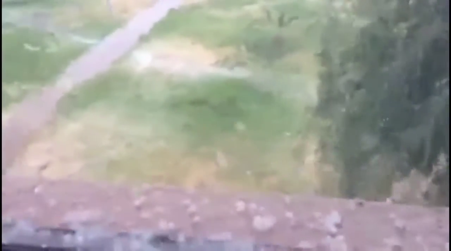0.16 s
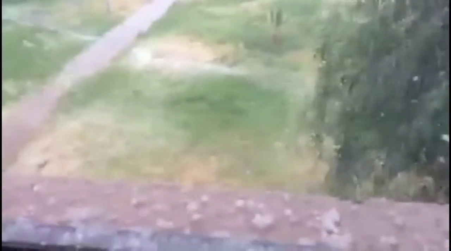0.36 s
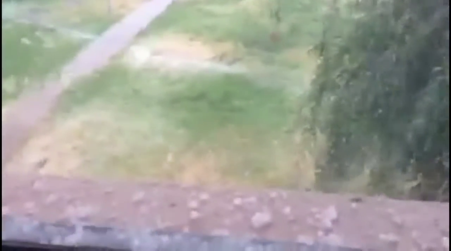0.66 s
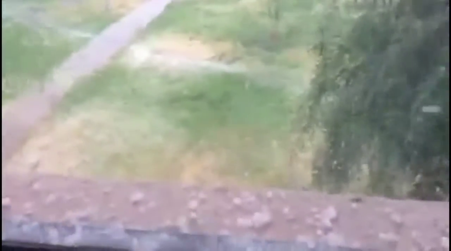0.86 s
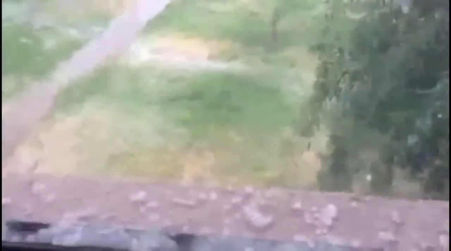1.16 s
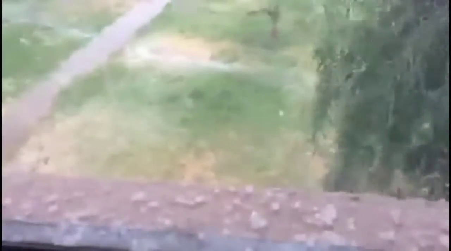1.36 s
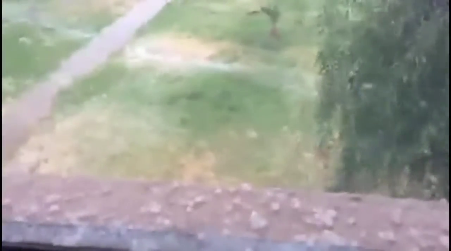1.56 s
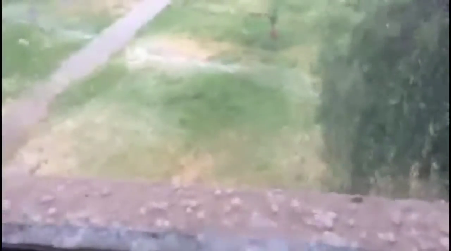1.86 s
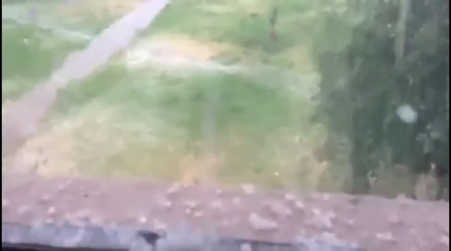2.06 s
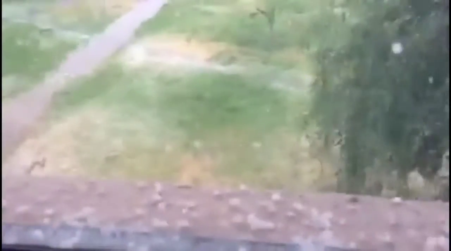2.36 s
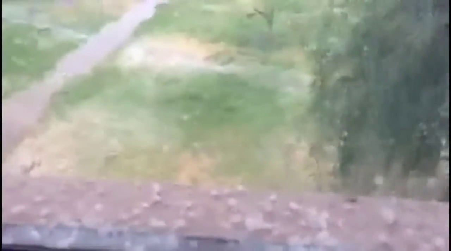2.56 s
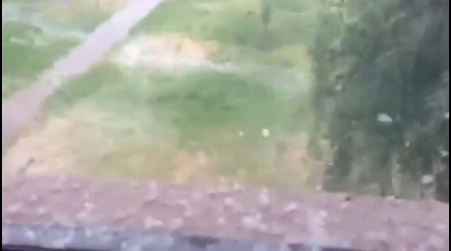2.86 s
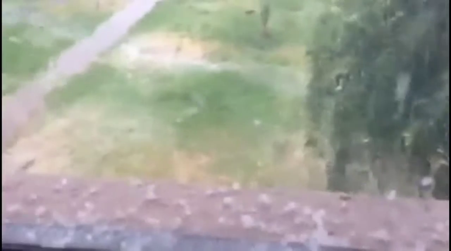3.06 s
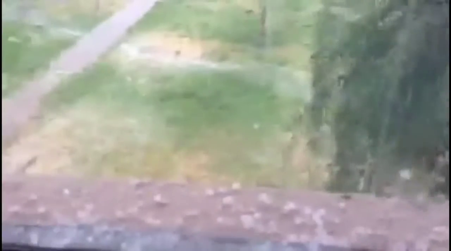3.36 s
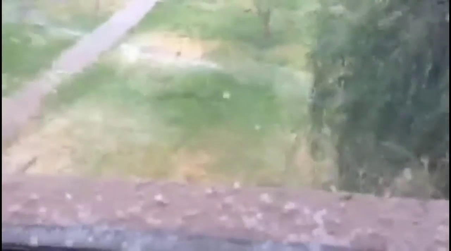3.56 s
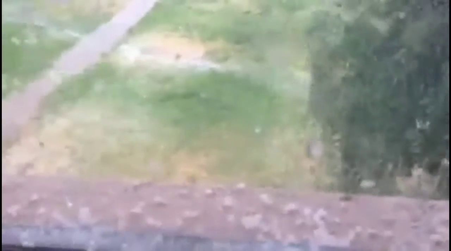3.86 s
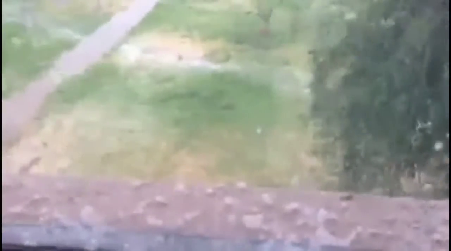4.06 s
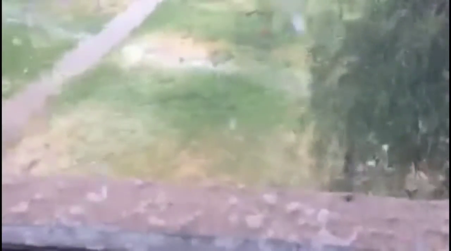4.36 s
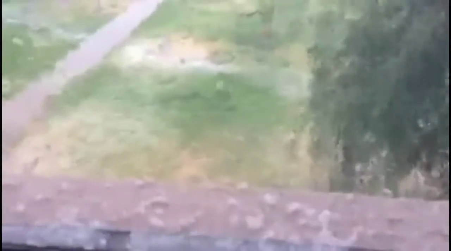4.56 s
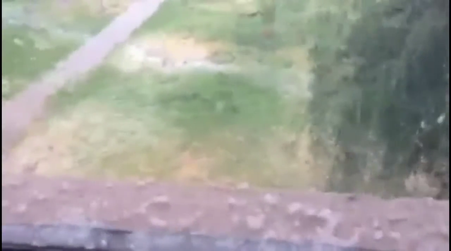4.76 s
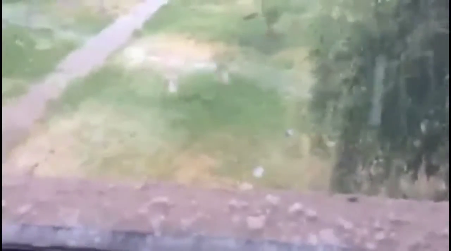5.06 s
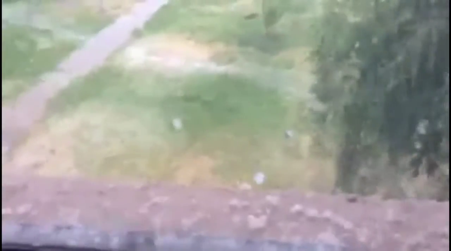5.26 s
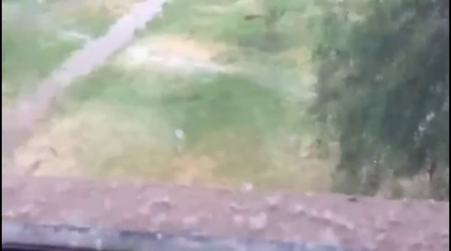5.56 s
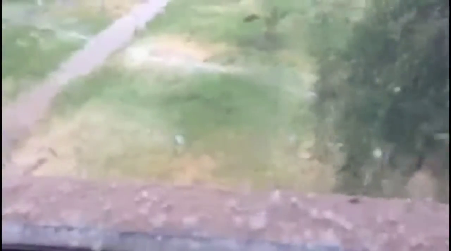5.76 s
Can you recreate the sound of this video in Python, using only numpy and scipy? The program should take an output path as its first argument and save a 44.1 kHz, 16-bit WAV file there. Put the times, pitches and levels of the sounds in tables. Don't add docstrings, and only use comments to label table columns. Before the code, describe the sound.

A hailstorm is heard from right beside a window for six seconds. From the start, light stones tap a sheet-metal sill in irregular clicks, each a sharp crack with a very short metallic rattle, some farther along the ledge. At about 0.5 s heavier stones join, louder and fuller, and several thud dully on the wooden frame around 0.8 to 1 s. The window pane's low drumming is strongest just after 1.2 s. Tiny lulls of hundredths of a second separate the bursts. After 2 s fine hail thickens between the big hits, with a busy cluster near 2.5 to 3 s and another surge past 3.5 s. Loud cracks, gritty skids and small bounces crowd together around 5.1 s and 5.5 s, and the fall carries on to the end. Thin, unsteady rain hiss stays quiet behind, with a short recess echo. The phone-like sound is close, hard and slightly squashed, with dulled extreme treble.

```python
import sys
import numpy as np
from scipy import signal
from scipy.fft import rfft, irfft
from scipy.io import wavfile
from scipy.ndimage import uniform_filter1d

SR = 44100
rng = np.random.default_rng(int(sys.argv[2]) if len(sys.argv) > 2 else 0)


def level_to_linear(level):
    exponent = np.asarray(level, float) / 20
    return 10 ** exponent


def log_audio(samples):
    frames = np.atleast_2d(samples).T
    limited = np.clip(frames, -1, 1)
    pcm = np.round(limited * 32767).astype(np.int16)
    wavfile.write(sys.argv[1], SR, pcm)


N = 260631


def colour(points, hz):
    f, db = np.transpose(points)
    return level_to_linear(np.interp(np.log(hz + 1), np.log(f), db))


def mode(hz, centre_hz, width_hz):
    return 1j * hz * width_hz / (centre_hz ** 2 - hz ** 2 + 1j * hz * width_hz)


def unit(x):
    return x / np.sqrt(np.mean(x ** 2))


def walk(rate):
    k = int(SR / rate)
    held = np.repeat(rng.standard_normal(N // k + 1), k)
    return uniform_filter1d(uniform_filter1d(held, k), k)[:N]


def stones():
    # start in seconds, level in dB, treble share in dB, length in ms
    heavy = [(0.526, -14, -8.5, 3.2), (0.816, -19.5, -6, 13), (0.973, -17, -4, 7.8),
             (1.1277, -22, -9.5, 13), (1.2811, -18.5, -4, 14.8), (1.7544, -14.5, -2.5, 3.4),
             (2.16, -18, -48.5, 8.9), (2.5807, -23, -5.5, 28), (2.6594, -20, -8.5, 12),
             (2.8195, -19, -4, 9.5), (2.94, -17, -8.5, 8), (3.2488, -24, -4.5, 23), (3.264, -17, -10, 7.6),
             (3.4707, -16.5, -4, 12), (3.572, -17.5, -5.5, 11), (3.6944, -14.5, -1.5, 10),
             (3.7055, -22, -16.5, 14), (3.9489, -15.5, -6, 6.8), (4.0973, -18, -4.5, 12),
             (4.303, -21, -9.5, 14), (4.7115, -17.5, -13, 14), (4.9352, -22, -2.5, 17),
             (4.9756, -19, -13, 11), (5.0957, -18, -4.5, 6.7), (5.1264, -16.5, -20.5, 8.7),
             (5.1533, -14.5, -1.5, 8.9), (5.4654, -21, -11, 19), (5.5398, -22, -9.5, 9),
             (5.5462, -21, 2, 11), (5.7861, -24.5, -11.5, 29)]
    # start in seconds, level in dB, length in ms
    medium = [(0.0875, -24, 9.1), (0.3181, -21, 2), (0.4581, -29, 16), (0.7868, -25.5, 11),
              (1.0569, -23.5, 13), (1.4431, -18, 3.2), (1.5223, -21, 7.2), (1.77, -18, 3.1),
              (1.8907, -19.5, 6.3), (2.129, -17.5, 3.4), (2.21, -21.5, 7.5), (2.3124, -24.5, 6.8),
              (2.4854, -23.5, 7.4), (2.6004, -16.5, 3.3), (3.0315, -17, 3.2), (3.1617, -20.5, 6.2),
              (3.1772, -14, 2.3), (3.4055, -21.5, 17), (3.7757, -24, 23), (3.825, -27.5, 16),
              (4.2067, -20.5, 7.8), (4.3739, -18, 5), (4.3886, -17, 3.3), (4.4715, -19, 2.9),
              (4.5851, -20, 5.7), (4.9254, -21, 11), (5.5278, -19, 5.1), (5.6203, -19, 7.8),
              (5.6702, -17, 8.5), (5.8134, -21, 6.8)]
    # start in seconds, level in dB, length in ms
    more_medium = [(0.1788, -24, 5.6), (0.3462, -24, 17), (0.651, -23, 13), (0.748, -21.5, 4.9), (0.857, -24, 11),
                   (1.1924, -19.5, 5), (1.2071, -25, 5.7), (1.2516, -22.5, 16), (1.6141, -24, 17),
                   (1.6525, -21, 17), (1.7789, -25.5, 8.7), (1.9038, -22.5, 5.9), (2.284, -27.5, 11),
                   (2.474, -21, 11), (2.5538, -23, 8.4), (2.6137, -23, 12), (2.6805, -19, 8.6),
                   (2.7538, -26.5, 11), (2.9839, -20.5, 16), (3.5113, -23, 8.6), (3.531, -26, 11.2),
                   (4.071, -23, 12), (4.2716, -23.5, 17), (4.4144, -26.5, 8), (4.8435, -22, 16), (5.05, -21, 6.3),
                   (5.2203, -23, 14), (5.2355, -26, 26), (5.6363, -22.5, 11.5), (5.8705, -28.5, 38)]
    # start in seconds, level in dB
    small = [(0.0359, -27), (0.0562, -28), (0.5565, -25), (0.6858, -25), (1.0171, -29.5), (1.222, -25.5),
             (1.3145, -28), (1.4736, -37.5), (1.566, -24), (1.7955, -21), (1.9517, -24.5), (2.3528, -33.5),
             (2.381, -23), (2.5253, -26.5), (2.8555, -20.5), (3.091, -26), (3.218, -27.5), (3.4445, -26),
             (3.6293, -24), (3.6527, -28.5), (3.8107, -23), (3.894, -27.5), (4, -32), (4.2339, -28.5),
             (4.515, -31.5), (4.662, -25.5), (4.7968, -25), (5.0045, -26), (5.286, -21.5), (5.4173, -26.5)]
    # start in seconds, level in dB
    further_small = [(0.0032, -29), (0.111, -35.5), (0.202, -29), (0.2336, -31.5), (0.3071, -26.5), (0.4151, -29),
                     (0.584, -28.5), (1.0383, -29.5), (1.176, -27), (1.3506, -27), (1.727, -30.5), (1.877, -27.5),
                     (2.0881, -33.5), (2.1941, -25), (2.3248, -23.5), (2.733, -25), (2.7772, -25.5), (3.0517, -19.5),
                     (3.311, -26), (3.3333, -29.5), (3.3824, -27.5), (3.4956, -28), (3.5981, -28), (4.0315, -22.5),
                     (4.4463, -27.5), (4.7622, -26), (4.8947, -27), (5.6068, -33), (5.748, -29.5), (5.8325, -22.5)]
    small_ms, further_small_ms = 8.5, 9.5
    small_rows = [(s, db, small_ms) for s, db in small]
    further_small_rows = [(s, db, further_small_ms) for s, db in further_small]
    middling = np.r_[medium, more_medium, small_rows, further_small_rows]
    treble_db = -7.5 + 6.5 * rng.standard_normal(len(middling))
    return np.r_[heavy, np.insert(middling, 2, treble_db, axis=1)].T


def strikes(s, level_db, treble_db, length_ms):
    # frequency in Hz, level in dB per Hz
    strike_colour = [(35, -40.5), (60, -24), (186, -7.5), (427, -10), (877, -10.5), (1610, -7.5),
                     (2140, -6), (4210, -6), (9860, -12), (11000, -20), (14300, -76), (22000, -120)]
    # frequency in Hz, width in Hz, level in dB
    sill_rings = [(2274, 420, 3.5), (3150, 22, -1), (3346, 650, 1.5), (4187, 340, 2), (4850, 48, 2)]
    size = 4096
    lead = 64
    t, hz = np.arange(size) / SR, np.fft.rfftfreq(size, 1 / SR)
    chance = rng.standard_normal((len(s), 2 * size + 16))
    grit, rattle, place = chance[:, :size], chance[:, size:2 * size], chance[:, 2 * size:]
    age = t / (length_ms[:, None] / 1000)
    glance = np.exp(0.59 * place[:, [14]])

    crack = grit ** 3 * level_to_linear(-6) * (1 - np.exp(-t / (0.0005 * glance))) * np.exp(-(age / .55) ** 1.6)
    crack[:, 12] += 1.5 / glance[:, 0]
    rattle = rattle * (1 - np.exp(-age / (0.16 * glance))) * np.exp(-age ** 1.7)

    rings, own = 0, 0
    for k, (f, width, db) in enumerate(sill_rings):
        rings = rings + level_to_linear(db + 2.2 * place[:, [k]]) * mode(hz, f, width)
    for k in (8, 10, 12):
        own = own + level_to_linear(3 * place[:, [k]]) * mode(hz, 3200 * np.exp(.45 * place[:, [k + 1]]), 330)
    body = (1 + level_to_linear(-1) * rings + level_to_linear(-5.5) * own) * colour(strike_colour, hz)
    body = body * level_to_linear((4.1 * place[:, [15]] - 3.5) / (1 + (hz / 1300) ** 4))
    hardness_db = np.maximum(level_db[:, None] + 29.5, 0)
    body = body * level_to_linear(-.5 * hardness_db / (1 + (hz / 600) ** 2))

    treble = 1 / (1 + (5500 / (hz + 1)) ** 6)
    spec = (rfft(crack) + level_to_linear(3.5) * rfft(rattle) * (1 - 0.94 * treble)) * body
    low, high = spec * (1 - treble), spec * treble
    low = low / np.linalg.norm(low, axis=1, keepdims=True)
    high = high / np.linalg.norm(high, axis=1, keepdims=True)
    mixed = low + level_to_linear(np.maximum(treble_db[:, None], -15) + 2.0) * high
    hit = irfft(mixed * np.exp(-2j * np.pi * hz * lead / SR))
    hit *= level_to_linear(level_db[:, None]) * np.sqrt(length_ms[:, None] * SR / 1000)
    hit /= np.linalg.norm(irfft(mixed * np.exp(-2j * np.pi * hz * lead / SR)), axis=1, keepdims=True)
    out = np.zeros(N + 2 * size)
    for start, one in zip((s * SR).astype(int), hit):
        out[start:start + size] += one
    return out[lead:N + lead]


def patter(landed_s, landed_db, count=350, over_db=-1, spread_db=3.0, top_db=-32):
    # time in seconds, level in dB
    fine_hail = [(0.0, -38), (0.18, -37), (0.33, -45), (0.67, -35.5), (1.79, -39.5), (1.92, -33),
                 (2.16, -37.5), (2.34, -26.5), (2.68, -35.5), (3.22, -41.5), (3.61, -27.5), (3.9, -38.5),
                 (4.08, -35.5), (4.26, -32.5), (4.61, -33.5), (5.08, -34), (5.3, -32), (5.91, -44.5)]
    # middle in seconds, half length in ms, depth in dB
    lulls = [(0.155, 58, 12.5), (0.29, 9.1, 13), (0.442, 20, 16), (0.5, 20, 10.5), (0.773, 7.2, 18),
             (0.958, 10, 6), (1.089, 31, 15.5), (1.415, 13, 10), (1.596, 18, 9), (1.688, 15, 2),
             (1.849, 20, 0), (2.05, 8.3, 5.5), (2.148, 6.4, 11.5), (2.45, 13, 6.5), (2.9, 12, -14),
             (3.234, 22, 6), (3.36, 15, 11), (3.792, 19, 10), (3.925, 14, 7), (3.983, 17, 15.5),
             (4.165, 34, 4.5), (4.69, 12, 6.5), (4.91, 17, 11), (5.18, 8.6, 8), (5.36, 20, 8),
             (5.59, 13, 3), (5.725, 15, 6.5), (5.77, 7.3, 8.5)]
    hop_s, hop_spread, hop_loss_db, hop_top_db = .016, .3, 10, -32
    settle_db_per_s = 54
    hop = rng.standard_normal((len(landed_s), 2)).T
    hop_at = np.minimum(landed_s + hop_s * np.exp(hop_spread * hop[0]), N / SR)
    hop_db = np.minimum(landed_db - hop_loss_db, hop_top_db) + 2.5 * hop[1]

    u = rng.random((len(hop_at) + count, 4)).T
    s = (np.arange(count) + u[0, :count]) / count * N / SR
    since_s = np.where(s[:, None] > landed_s, s[:, None] - landed_s, .1).min(axis=1)
    level_db = np.interp(s, *np.transpose(fine_hail)) + over_db
    level_db = level_db - settle_db_per_s * since_s - spread_db * np.log(u[1, :count])

    s, level_db = np.r_[s, hop_at], np.r_[np.minimum(level_db, top_db), hop_db]
    lull_db = 0
    for middle, half_ms, db in lulls:
        lull_db = lull_db + db * np.exp(-((s + .005 - middle) * 1000 / half_ms) ** 4)
    return strikes(s, level_db - lull_db, -11 + 6 * u[2], 7 + 7 * u[3])


def thuds(width_hz=170, push_s=0.0016):
    # start in seconds, peak in dB, pitch in Hz
    frame_blows = [(0.524, -29, 885), (0.684, -23.5, 590), (0.815, -19.5, 250), (0.972, -20, 293),
                   (1.056, -28, 310), (1.753, -21, 280), (2.018, -29, 633), (2.158, -22, 1050),
                   (2.284, -23, 1110), (2.38, -21, 447), (2.581, -23.5, 348), (2.819, -21.5, 250),
                   (3.092, -26.5, 513), (3.471, -23, 746), (3.57, -25.5, 710), (4.845, -21, 1010),
                   (4.976, -24, 990), (5.606, -21.5, 1120)]
    out, t = np.zeros(N + 4096), np.arange(4096) / SR
    envelope = (1 - np.exp(-t / push_s)) * np.exp(-np.pi * width_hz * t)
    for s, db, hz in frame_blows:
        neighbour_hz = hz * (1.6 + .5 * rng.random())
        ring = np.sin(2 * np.pi * hz * t) + 0.57 * np.sin(2 * np.pi * neighbour_hz * t)
        start = int(s * SR)
        out[start:start + len(t)] += level_to_linear(db + 4) * ring * envelope
    return out[:N]


def pane(near):
    # time in seconds, level in dB
    storm = [(0.0, -39), (0.49, -50), (0.59, -39), (1.25, -51), (1.28, -33.5), (1.41, -52), (1.91, -42.5),
             (1.99, -56.5), (2.42, -39), (2.53, -56.5), (2.58, -42), (3.39, -44.5), (3.56, -39.5),
             (3.87, -47.5), (5.79, -41.5), (5.91, -58)]
    # frequency in Hz, width in Hz, level in dB
    pane_modes = [(190, 18, 8), (250, 80, -3), (630, 260, -11.5)]
    hz = np.fft.rfftfreq(N, 1 / SR)
    drum_db = np.interp(np.arange(N) / SR, *np.transpose(storm))
    taps = rng.standard_normal(N) * (rng.random(N) < 150 / SR)
    shaking = uniform_filter1d(np.abs(near), 40) * np.sign(walk(60))
    blows = unit(taps) + level_to_linear(-14.5) * unit(shaking)
    pelting = unit(signal.lfilter([1], [1, -np.exp(-1 / (0.084 * SR))], near ** 2)) ** 0.15
    glass = sum(level_to_linear(db) * mode(hz, f, width) for f, width, db in pane_modes)
    return pelting * level_to_linear(drum_db - 3.0) * unit(irfft(rfft(blows) * glass, N))


def rain(rain_db):
    # frequency in Hz, level in dB per Hz
    rain_colour = [(18, -66), (30, 1.5), (85, -25), (201, 4.5), (864, -5.5), (3530, -6.5), (9960, -20),
                   (11000, -24), (14300, -35), (22000, -120)]
    hz, out, swell = np.fft.rfftfreq(N, 1 / SR), 0, walk(11)
    for centre in 40 * 2 ** np.arange(0, 8.6, .5):
        drops = rng.standard_normal(N) * level_to_linear(3.3 * rng.exponential(size=N))
        band = irfft(rfft(drops) * mode(hz, centre, centre / 3) ** 2 * colour(rain_colour, hz), N)
        out = out + band * level_to_linear(3.2 * swell + 2.6 * walk(25))
    return level_to_linear(rain_db) * unit(out)


def recess_echo(near):
    t = np.arange(8000) / SR
    tail = signal.lfilter([1], [1, -.6], rng.standard_normal(8000)) * level_to_linear(-60 * t / 0.093)
    boom = rng.standard_normal(8000) * level_to_linear(-60 * t / 0.25)
    lows = signal.sosfilt(signal.butter(2, 1200, fs=SR, output="sos"), near)
    echo = signal.fftconvolve(near, tail)[:N] * level_to_linear(-51.5)
    return echo + signal.fftconvolve(lows, boom)[:N] * level_to_linear(-32.5)


def scene():
    landed = stones()
    near = strikes(*landed) + patter(*landed[:2])
    return (near + recess_echo(near) + thuds() + pane(near) + rain(-47.5))[None]


def phone_blocks(x, coarse=0.89, bass_finer=0.43, least_db=-56, frame_db=-14):
    block, grid, frame_start = 256, 247, 4
    n = np.arange(2 * block)
    rise = np.cumsum(np.kaiser(block + 1, 6 * np.pi))
    rise = np.sqrt(rise[:-1] / rise[-1])
    window = np.r_[rise, rise[::-1]][:, None]
    basis = window * np.cos(np.pi / block * np.outer(n + .5 + block / 2, n[:128] + .5))
    lead = (8 - frame_start) * block - grid
    blocks = (N + lead) // (8 * block) * 8 + 8
    x = np.pad(x, (lead, (blocks + 1) * block - N - lead))
    c = np.lib.stride_tricks.sliding_window_view(x, 2 * block)[::block] @ basis * np.sqrt(2 / block)

    power = np.mean(c.reshape(blocks, 16, 8) ** 2, axis=2)
    group = np.repeat(power.reshape(-1, 4, 16).mean(axis=1), 4, axis=0)
    frame = np.repeat(power.reshape(-1, 8, 16).mean(axis=1), 8, axis=0)
    loud = np.sqrt(group + level_to_linear(frame_db) * frame)
    share = coarse * np.linspace(.1, 1, 16) ** bass_finer
    step = np.repeat(np.maximum(share * loud, level_to_linear(least_db)), 8, axis=1)
    c = np.sign(c) * step * np.floor((np.abs(c) / step) ** .75 + .4054) ** (4 / 3)

    frames = c @ basis.T * np.sqrt(2 / block)
    gap = np.zeros(block)
    out = np.r_[frames[:, :block].ravel(), gap] + np.r_[gap, frames[:, block:].ravel()]
    return out[lead:lead + N]


def top_cut(x):
    return signal.sosfilt(signal.butter(12, 11640, fs=SR, output="sos"), x)


def record(dry):
    limited = np.tanh(1.125 * dry[0]) / 1.083
    x = signal.sosfilt(signal.ellip(10, .2, 70, 10336, fs=SR, output="sos"), limited)
    x = signal.sosfilt(signal.butter(1, 45, "high", fs=SR, output="sos"), x)
    x = phone_blocks(x)
    rounded = x - 0.27 * x ** 5
    return top_cut(rounded[None])


dry = scene()
out = record(dry)
log_audio(out)
```